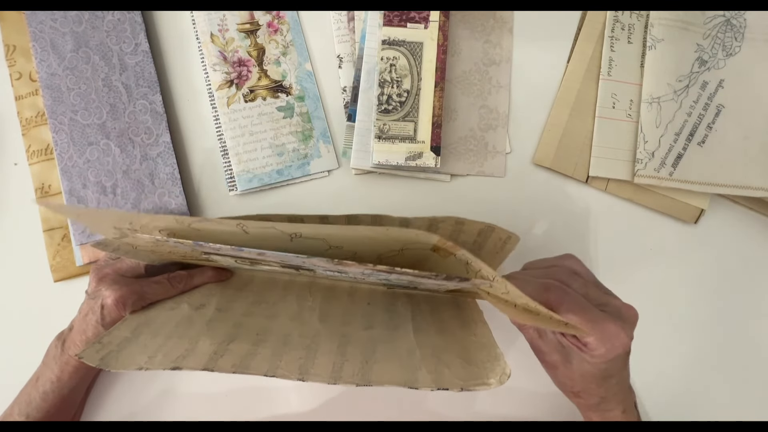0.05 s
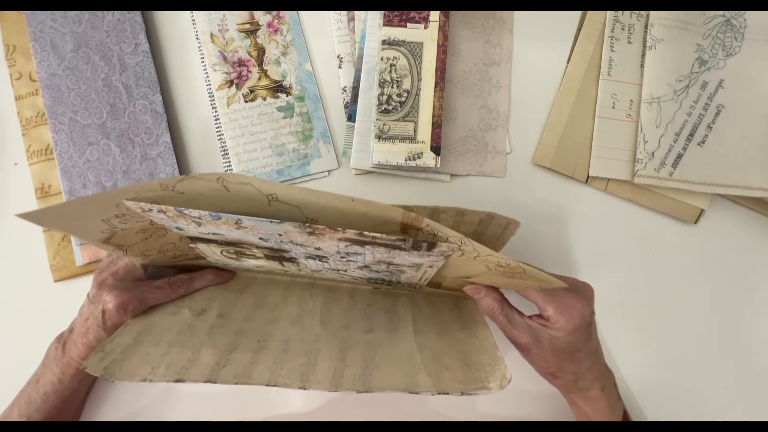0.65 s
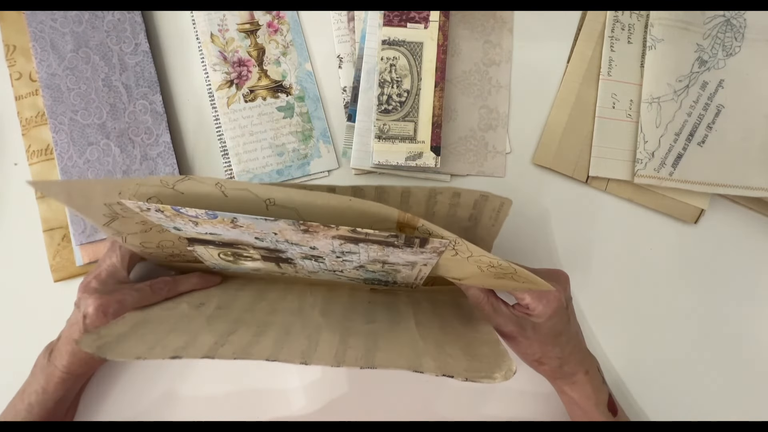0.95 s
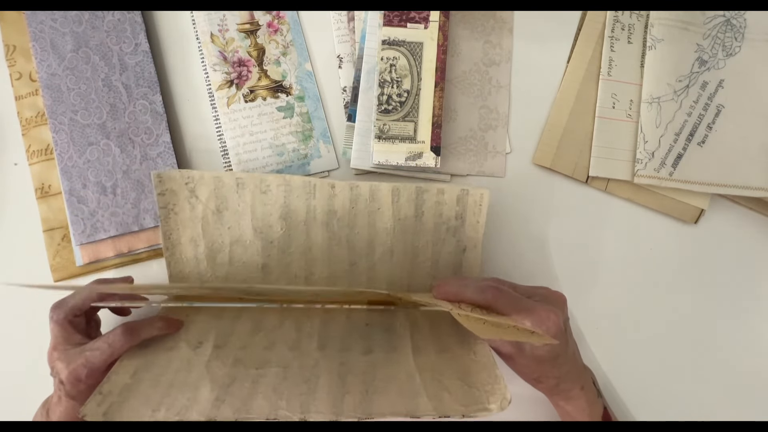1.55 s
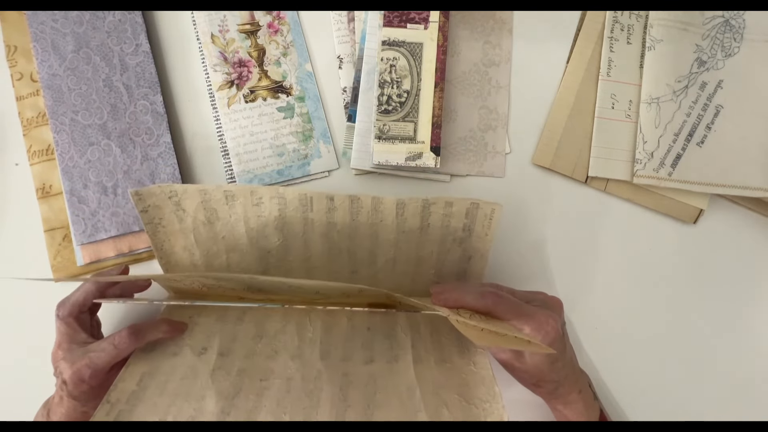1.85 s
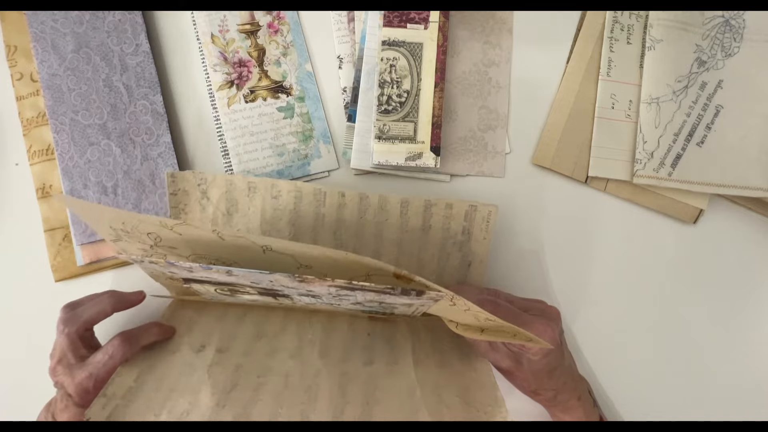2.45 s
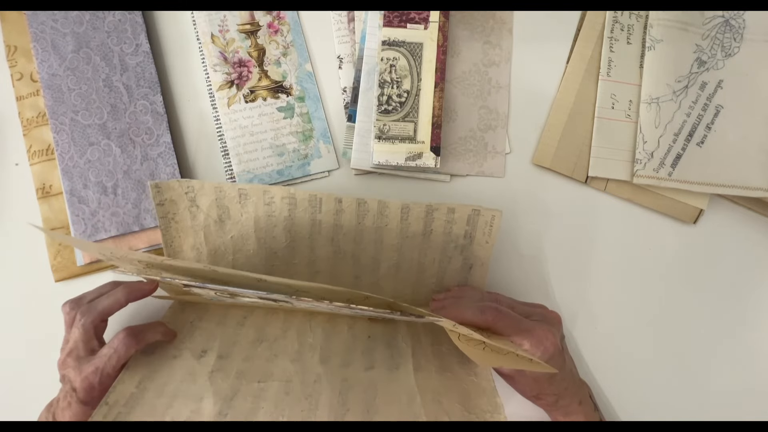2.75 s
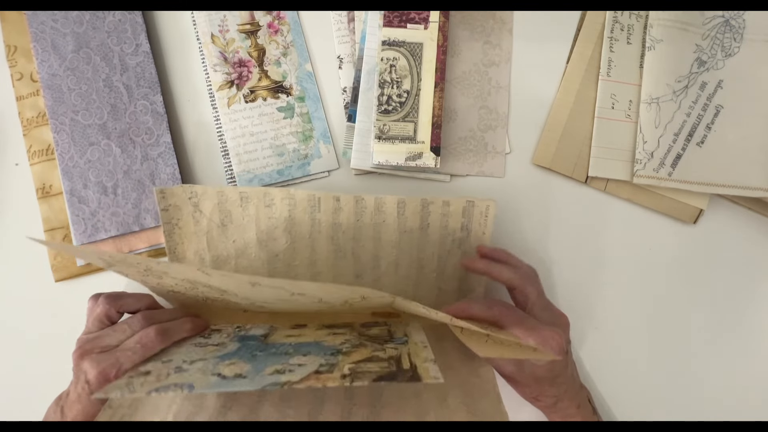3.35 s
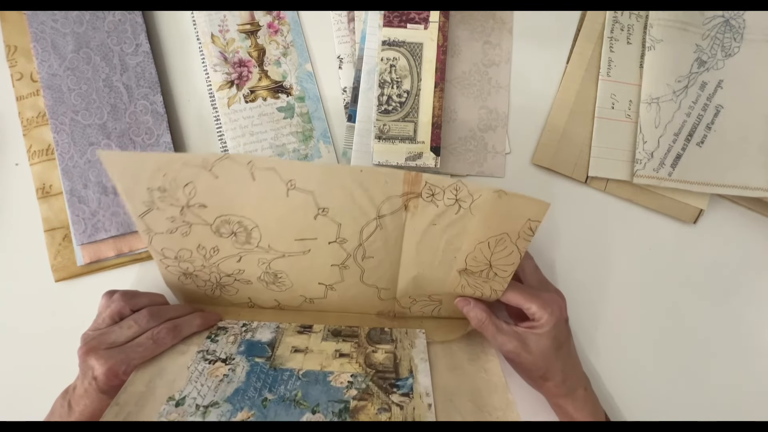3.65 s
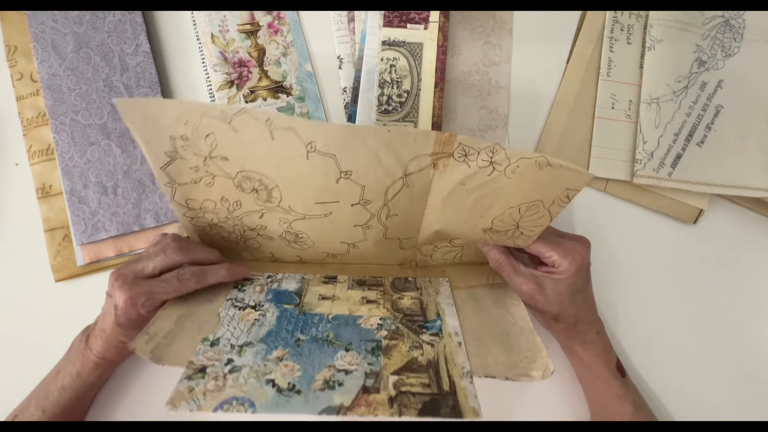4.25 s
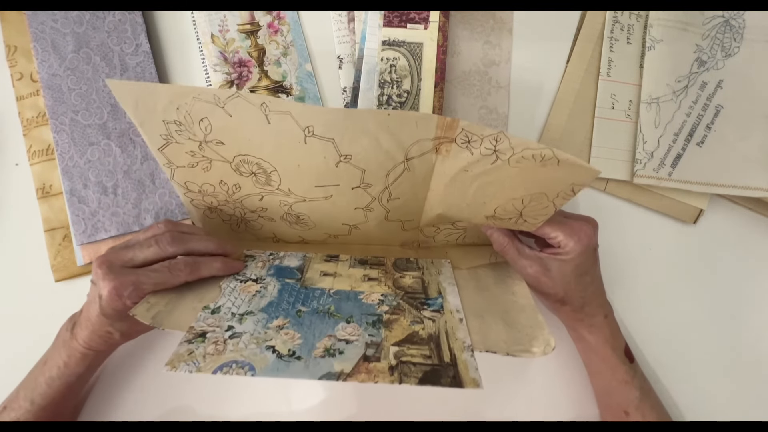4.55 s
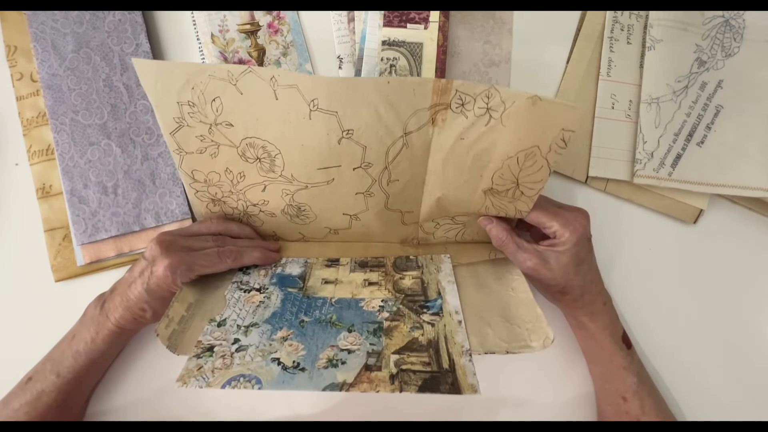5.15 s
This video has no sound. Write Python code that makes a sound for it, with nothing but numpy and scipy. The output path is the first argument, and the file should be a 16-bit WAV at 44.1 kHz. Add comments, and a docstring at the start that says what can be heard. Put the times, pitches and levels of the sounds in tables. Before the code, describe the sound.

Dry, irregular rustling and crackling of stiff paper as sheets buckle, slide together and tap on a table.

```python
"""Stiff old paper is leafed through and squared up over a craft table in a small room.
From the start the sheets buckle in dry snaps, tap each other and the table, and slide with a grainy hiss.
A hard flurry of snaps comes at about 2 s, then the handling turns sparse and soft. Near 3.7 s the cover
sheet is turned up and colours a run of crisp snaps, which eases into light taps and a last slide.
The walls answer throughout, over a faint room tone and a weak hum."""
import sys
import numpy as np
from scipy import signal
from scipy.fft import rfft, irfft, next_fast_len
from scipy.io import wavfile
from scipy.ndimage import uniform_filter1d, map_coordinates

SR = 44100
rng = np.random.default_rng(int(sys.argv[2]) if len(sys.argv) > 2 else 0)


def pcm_store(signal):
    """Save signal as 16-bit PCM."""
    levels = np.round(np.clip(np.atleast_2d(signal), -1, 1) * 32767)
    wavfile.write(sys.argv[1], SR, levels.astype(np.int16).T)


N = 229176


def snaps(rows, pop=0.41, pop_decay_s=0.0004, loading_s=0.0014, rough_db=1.5, ring_q=9.8):
    """Fibres crackle as a sheet loads, it pops through, and bending waves die out in it."""
    # the knock, flap, crack and crisp bands of a snap: (low edge [Hz], high edge [Hz])
    ranges = [(270, 750), (750, 2200), (2200, 6000), (6000, 14500)]
    bands = [signal.butter(3, edges, "bandpass", fs=SR, output="sos") for edges in ranges]
    _, flap, crack, crisp = np.log2(ranges).mean(axis=1)  # band centres in octaves
    lead = SR // 100
    t = np.arange(-lead, SR // 8) / SR
    after = np.maximum(t, 0)
    release = pop * np.exp(-after / pop_decay_s) * (t >= 0)
    out = np.zeros(N + SR)
    for start, snap_db, tilt, knock_db, t60, ring_hz, ring_db in rows:
        # a tight buckle tilts the snap towards the treble, a loose flap towards the bass
        levels = [knock_db, snap_db + tilt * (flap - crack), snap_db + 1, snap_db + tilt * (crisp - crack)]
        crackle = rng.standard_normal(len(t)) * amp(rough_db * rng.standard_normal(len(t)))
        loading_db = -5 + 5.5 * np.log2(t60 / 0.028)  # longer snaps crackle more before the pop
        loading = amp(loading_db) * np.exp(-np.abs(t) / loading_s) * (t < 0)
        decay = amp(-60 * after / t60) * (t >= 0)
        force = crackle * (loading + release + decay)
        # the buckling patch rings for a few cycles at a pitch set by its size
        patch = signal.iirpeak(ring_hz, ring_q, fs=SR)
        snap = force + amp(ring_db) * signal.lfilter(*patch, force)
        for sos, db in zip(bands, levels):
            band = signal.sosfilt(sos, snap)
            band *= np.sqrt(0.01 * SR) / np.linalg.norm(band)  # the energy of 10 ms at rms 1
            out[round(start * SR):][:len(t)] += amp(db) * band
    return out[lead:lead + N]


def edge_ticks(drag, count=36, tilt=-6, t60=0.017, ring_db=13.5):
    """Rows for snaps(): sliding edges catch, more often and louder under a harder drag."""
    chance = np.cumsum(np.sqrt(drag))
    moments = np.searchsorted(chance, chance[-1] * (np.arange(count) + rng.random(count)) / count)
    rows = []
    for i, (size, colour, patch) in zip(moments, rng.standard_normal((count, 3))):
        tick_db = 20 * np.log10(drag[i] + 1e-9) - 6 + size
        ring_hz = 1200 * 2 ** (patch / 2)
        rows.append((i / SR, tick_db, tilt + colour, tick_db - 3, t60, ring_hz, ring_db))
    return rows


def hand_strokes(attack_s=0.03, release_s=0.035, waver_db=0.66):
    """Envelopes of the drag and the bright rub: each stroke swells, holds and dies away."""
    # one sheet slides along another: (start [s], length [s], drag level [dB], rub over drag [dB])
    strokes = [(0, .27, -52.5, -9.5), (0.377, .13, -60, -0.5), (0.447, .06, -51, -17),
               (0.611, .25, -58.5, -2.5), (.94, .2, -61, -3.5), (1.251, .29, -64, -2),
               (1.569, .13, -63.5, -11), (1.79, .06, -61, -6), (1.969, .08, -55, -7),
               (2.073, .26, -68, -15), (2.376, .14, -74, -9), (2.574, .02, -66, 0), (2.856, .23, -67.5, -6),
               (3.191, .06, -63, -5), (3.271, .06, -55.5, -18), (3.335, .05, -57.5, -4.5),
               (3.417, .12, -64, -7), (3.554, .055, -61, 0), (3.7, .16, -61.5, -4.5),
               (3.952, .13, -66, 2.5), (4.146, .11, -74.5, 4), (4.288, .13, -61, 3.5),
               (4.463, .07, -54, -10), (4.602, .14, -83, 9.5), (4.795, 0.12, -61.5, -2.5),
               (4.951, .25, -65.5, -8)]
    t = np.arange(N) / SR
    drag, rub = np.zeros(N), np.zeros(N)
    for start, length, db, bright_db in strokes:
        swell = np.clip((t - start) / attack_s + .5, 0, 1)
        fade = np.exp(-np.maximum(t - start - length, 0) / release_s)
        drag = np.hypot(drag, amp(db) * swell * fade)
        rub = np.hypot(rub, amp(db + bright_db) * swell * fade)
    pressure = amp(waver_db * wobble(rate=22))  # hands never press quite evenly
    return drag * pressure, rub * pressure


def sliding(drag_gain, rub_gain, drag_db=0.82, rasp_db=-2.54, sheen_db=-2.0):
    """Sheets rub in small jerks: coarse catches shake the whole sheet, edges rasp, fine fibres hiss."""
    # dull drag of the whole sheet: (frequency [Hz], relative level [dB])
    drag_eq = [(70, -35), (150, -8.5), (300, -1.5), (520, -1), (900, -2.5), (1800, -5), (2500, -14.5),
               (4500, -18), (9000, -38.5)]
    # rasp of the edges: (frequency [Hz], relative level [dB])
    rasp_eq = [(900, -30), (2200, -3.5), (3000, -7), (4600, -6), (6000, -4), (8000, -11), (12000, -26)]
    # airy sheen of the fibres: (frequency [Hz], relative level [dB])
    sheen_eq = [(3500, -26), (5500, -35), (7200, -3), (9000, -3), (12000, -2), (14500, -3.5), (16000, -5)]
    jerks_db = 3.0 * wobble(rate=90)
    drag = shaped(grains(rate=700, spread_db=2.5, smooth=0.5) * amp(jerks_db), drag_eq)
    # the finer the contact, the less it feels the jerks
    edges = grains(rate=2100, spread_db=2.5, smooth=0.6) * amp(0.52 * jerks_db)
    rasp = shaped(wandering_contact(edges, depth_db=2.5), rasp_eq)
    fibres = grains(rate=4500, spread_db=10, smooth=1.8) * amp(0.41 * jerks_db)
    sheen = shaped(wandering_contact(fibres, depth_db=2.7), sheen_eq)
    return drag_gain * amp(drag_db) * drag + rub_gain * (amp(rasp_db) * rasp + amp(sheen_db) * sheen)


def grains(rate, spread_db, smooth):
    """Fibres catch and let go: random impulses of uneven size over an even rub."""
    catches = rng.random(N) < rate / SR
    sizes = amp(spread_db * np.minimum(rng.exponential(size=N), 3)) * rng.choice([-1, 1], N)
    return unit(catches * sizes) + smooth * rng.standard_normal(N)


def wandering_contact(rub, depth_db):
    """The contact wanders over the sheet, so the colour of the rub keeps shifting."""
    frames = signal.stft(rub, nperseg=256)[2]
    drift = uniform_filter1d(rng.standard_normal(frames.shape), size=7, axis=0)
    drift = uniform_filter1d(drift, size=6, axis=1)
    return unit(signal.istft(frames * amp(depth_db * unit(drift)), nperseg=256)[1][:N])


def paper_body(contact, cover_up_s=3.72, turn_s=0.24):
    """Contacts ring through the inner leaves at first, then through the raised cover sheet."""
    # resonances and a dip common to all the stiff sheets: (centre [Hz], width [Hz], lift [dB])
    sheet = [(328, 230, -0.5), (560, 470, 2.5), (790, 46, 3), (1040, 260, 3), (1680, 98, 0.5),
             (3540, 710, 3.5), (4380, 980, 4.5), (8020, 1800, 1.5), (10140, 720, 2.5)]
    # added colour of the inner leaves: (centre [Hz], width [Hz], lift [dB])
    leaves = [(350, 200, -3.5), (514, 82, 2), (960, 160, -1.5), (1890, 350, 0), (2530, 950, -3)]
    # added colour of the large cover sheet: (centre [Hz], width [Hz], lift [dB])
    cover = [(298, 190, -4), (1160, 250, -3.5), (2800, 1050, 2), (13500, 4300, -4)]

    def bells(peaks):
        return lambda hz: sum(db / (1 + (2 * (hz - centre) / width) ** 2) for centre, width, db in peaks)

    raised = np.clip((np.arange(N) / SR - cover_up_s) / turn_s + .5, 0, 1)
    inner = coloured(contact * (1 - raised), bells(sheet + leaves))
    return inner + coloured(contact * raised, bells(sheet + cover))


def room_reverb(paper, paths=6):
    """The sheets keep moving, so the room answers each moment along other paths."""
    # tone of the room's return: (frequency [Hz], gain [dB])
    return_eq = [(150, 0.5), (700, -11.5), (2000, -11.5), (5000, -13.5), (9000, -4.5), (16000, -12.5)]
    path = np.arange(N) // (SR // 50) % paths  # switches every 20 ms
    wet = sum(signal.fftconvolve(paper * (path == k), wall_response())[:N] for k in range(paths))
    return coloured(wet, lambda hz: along(return_eq, hz))


def wall_response(echo_s=0.014, echo_db=-6.5, smear_s=0.00087, build_up_s=0.0078):
    """A near wall throws back a smeared echo; then the room rings briefly."""
    # decay between the walls: (frequency [Hz], t60 [s])
    walls = [(150, 0.21), (600, 0.27), (2000, 0.28), (5000, 0.33), (10000, 0.2), (16000, 0.28)]
    t = np.arange(SR // 2) / SR
    hz, frame_s, frames = signal.stft(rng.standard_normal(len(t)), SR, nperseg=256)
    decay = amp(-60 * frame_s / along(walls, hz)[:, None])
    tail = signal.istft(frames * decay, SR, nperseg=256)[1][:len(t)]
    tail *= 1 - np.exp(-t / build_up_s)
    echo = rng.standard_normal(len(t)) * np.exp(-np.abs(t - echo_s) / smear_s)
    return tail / np.linalg.norm(tail) + amp(echo_db) * echo / np.linalg.norm(echo)


def room_tone(air_db=-65.5, hum_hz=166.4, hum_db=-82):
    """A steady bed of low air noise and a slightly unsteady hum."""
    # the room's air: (frequency [Hz], relative level [dB])
    air_eq = [(12, -41), (20, 6), (60, -3.5), (158, -1), (624, -6), (1090, -12), (2080, -18.5), (2820, -22),
              (3740, -18), (5230, -23.5), (13200, -25), (14700, -25), (16000, -48)]
    hum = np.sqrt(2) * np.sin(2 * np.pi * hum_hz * np.arange(N) / SR + 0.051 * wobble(rate=4.09))
    return amp(air_db) * shaped(rng.standard_normal(N), air_eq) + amp(hum_db) * hum


def amp(db):
    """Decibels to gain."""
    return 10 ** (np.asarray(db) / 20)


def unit(x):
    """x at rms 1."""
    return x / np.sqrt(np.mean(x ** 2) + 1e-20)


def along(points, hz):
    """(Hz, value) points read on a log frequency axis."""
    freqs, values = np.transpose(points)
    return np.interp(np.log(hz + 1), np.log(freqs), values)


def wobble(rate):
    """A smooth random curve with rate knots a second."""
    return map_coordinates(rng.standard_normal(4096), [np.arange(N) * rate / SR], mode="wrap")


def coloured(x, db_of_hz):
    """x through a minimum-phase EQ with the given gain in dB."""
    size = 2 * next_fast_len(N // 2 + 8192)
    gain = amp(db_of_hz(np.fft.rfftfreq(size, 1 / SR)))
    cepstrum = irfft(np.log(gain + 1e-6))
    cepstrum[1:size // 2] *= 2
    cepstrum[size // 2 + 1:] = 0
    return irfft(rfft(x, size) * np.exp(rfft(cepstrum)))[:N]


def shaped(x, eq):
    """x through an EQ of (Hz, dB) points, at rms 1."""
    return unit(coloured(x, lambda hz: along(eq, hz)))


def scene():
    """Snaps, ticks and sliding ring through the same sheets, in the same room."""
    # a sheet buckles or taps: (time [s], snap level [dB], tilt [dB/octave], low knock level [dB],
    # t60 [s], ring pitch [Hz], ring over crackle [dB])
    buckles = [(.0334, -47.5, .5, -57, 0.018, 4750, 33), (.1272, -49.5, -3, -53, 0.088, 624, -10),
               (.1371, -48.5, -4.5, -44, 0.22, 1660, -7), (.1458, -59, -10.5, -49, .05, 1680, 14),
               (.1782, -53.5, -6.5, -57, .03, 1690, -7), (.2492, -48, -1.5, -61, 0.022, 4700, 3),
               (.255, -46.5, -3, -45.5, .1, 4500, -8), (.3661, -59, -3.5, -57.5, 0.041, 2130, 12),
               (.4471, -50.5, -3.5, -51.5, 0.04, 4900, -2), (.4821, -53, -4, -60, .04, 1710, 2),
               (.4958, -63, -5, -53, .04, 835, -3), (.5354, -56.5, -5.5, -51.5, 0.041, 1070, 10),
               (.5676, -52.5, -3.5, -50.5, 0.049, 563, -11), (.6289, -53, -2.5, -53, 0.11, 845, -1),
               (.6426, -52.5, -1, -48.5, 0.073, 1040, 0), (.6668, -54.5, -5, -51.5, .04, 1590, 3),
               (.7555, -54, -5, -48, 0.097, 860, 4), (.7996, -50.5, -3, -52, 0.089, 1060, 10),
               (.8271, -54, -3, -44.5, .1, 600, -12), (.8368, -55, -5.5, -57, 0.034, 1050, 9),
               (.8565, -55, -2, -71, 0.021, 1750, -2), (.9062, -58.5, -2, -50.5, 0.03, 820, 1),
               (.9279, -58, -5.5, -54, 0.047, 720, 7), (.9555, -46, -3.5, -74, 0.033, 1690, 2),
               (1.1921, -53.5, -2.5, -52, 0.043, 1110, -1), (1.3713, -57, -5, -47, .083, 860, 15),
               (1.4159, -80, -6, -44, 0.011, 1210, 1), (1.4192, -44.5, -6, -43.5, .019, 1200, 14),
               (1.4212, -48.5, 4, -62, 0.028, 7750, 12), (1.4786, -53.5, -6, -48.5, 0.018, 1200, 19),
               (1.5188, -60.5, -3.5, -54.5, .03, 1050, 12), (1.6841, -59.5, -2.5, -49, 0.023, 480, -2),
               (1.7949, -57.5, -3, -68, 0.028, 750, 8), (1.8838, -63, -5, -57.5, 0.021, 1350, 13),
               (1.9267, -51.5, -4, -57, 0.01, 4300, 6), (1.9414, -43.5, -5, -37.5, 0.039, 1080, 5),
               (1.9508, -48, -4, -38.5, 0.021, 700, 11), (1.9769, -37.5, -2.6, -47.5, .022, 1040, -9),
               (1.9852, -52, -10.5, -48, 0.01, 1080, -8), (1.9941, -56, -8, -46, 0.011, 674, 6),
               (2.0152, -47, -4, -72, .013, 3760, 6), (2.0322, -42.5, -6, -42, .018, 880, -1),
               (2.0487, -47.5, -4.5, -53, 0.017, 795, -4), (2.0544, -51.5, -5.5, -44.5, .076, 498, 6),
               (2.0781, -55.5, -4, -64, 0.036, 1040, 13), (2.2295, -64, -3, -76, 0.12, 830, 13),
               (2.601, -65.5, -8, -67, 0.018, 647, 13), (2.6574, -43.5, 5.5, -46.5, 0.059, 10600, -2),
               (2.6584, -48, -6.5, -52, 0.061, 1320, 1), (2.6709, -52.5, 4.5, -55, 0.012, 10400, -10),
               (3.0701, -65.5, -2.5, -78, .06, 1280, 19), (3.1233, -63.5, 2, -80, 0.075, 4570, 18),
               (3.2493, -61, -9.5, -58, 0.028, 1110, -12), (3.2581, -70.5, -15, -53.5, .08, 1320, 1),
               (3.2702, -58.5, -6.5, -78, 0.028, 4440, 6), (3.3169, -64.5, -10, -56, 0.041, 594, 7),
               (3.4485, -50, -3, -58, 0.03, 1370, 7), (3.5543, -44.5, 3.5, -56, .024, 4850, 14),
               (3.669, -58.5, -5, -59, 0.073, 1990, -2), (3.6935, -61, -8.5, -63, 0.012, 1080, -12),
               (3.7322, -53, -1.5, -58, 0.019, 696, 5), (3.8578, -57, -5.5, -54.5, .02, 2100, 2),
               (3.936, -45, 1, -53.5, 0.057, 870, 2), (4.0194, -43.5, 2, -56, 0.048, 7240, 4),
               (4.2401, -67, -8.5, -52, .09, 560, -11), (4.2624, -53.5, -4.5, -59, 0.074, 860, -7),
               (4.2977, -41, 0.5, -48, 0.039, 2860, -5), (4.3102, -51, 3.5, -58, 0.11, 7140, 8),
               (4.3622, -53, -4, -54.5, .02, 2510, 1), (4.3717, -49, -1, -73, .12, 1710, 6),
               (4.4763, -41.5, 0, -47, 0.13, 3540, 3), (4.505, -50, -5.5, -56, 0.14, 670, 2),
               (4.5141, -60, -5.5, -59, 0.068, 1540, 8), (4.7962, -69.5, -5, -56.5, .05, 650, 0),
               (4.8323, -66, -9, -64, 0.013, 1050, 10), (4.8961, -62, -4.5, -55, 0.038, 3090, 17),
               (4.9391, -56, -2, -51.5, 0.047, 585, -1), (5.0463, -57.5, -7, -62, 0.027, 930, -1),
               (5.0948, -68, -11.5, -50.5, 0.017, 1600, 15), (5.1131, -63, -5.5, -57.5, 0.0037, 3140, 8),
               (5.1445, -61.5, -3, -60, 0.23, 4130, 2)]
    drag, rub = hand_strokes()
    contact = snaps(buckles + edge_ticks(drag)) + sliding(drag, rub)
    paper = amp(-1.0) * paper_body(contact)
    return (paper + room_reverb(paper) + room_tone())[None]


def record(dry, top_hz=15950):
    """A brick-wall low-pass takes off the very top of the treble."""
    size = next_fast_len(N + 8192)
    passband = np.fft.rfftfreq(size, 1 / SR) < top_hz
    return irfft(rfft(dry, size) * passband, size)[:, :N]


dry = scene()
out = record(dry)
pcm_store(out)
```